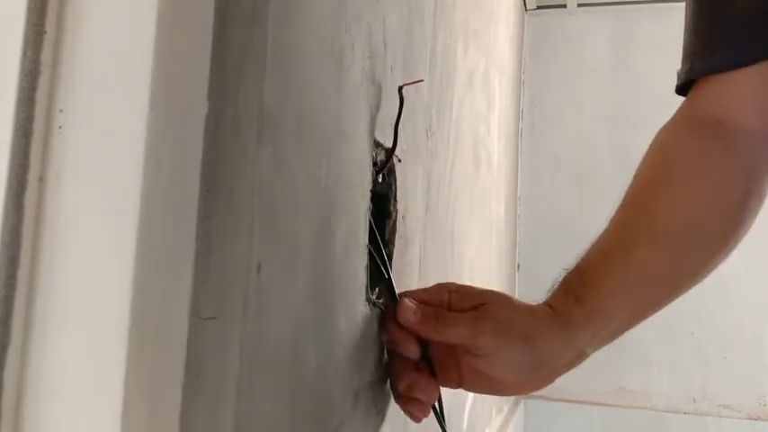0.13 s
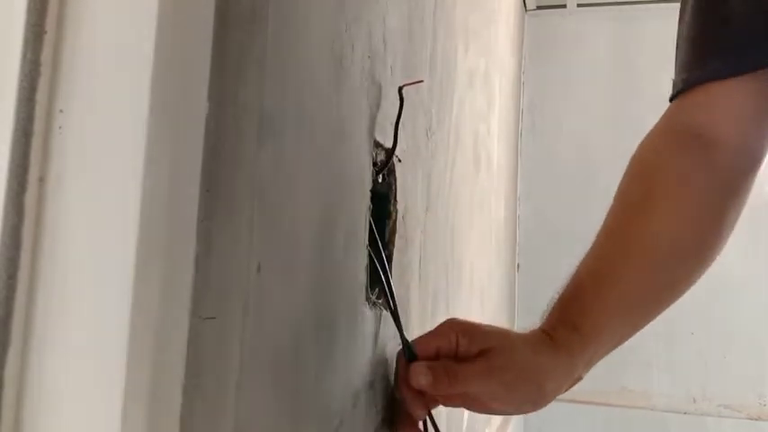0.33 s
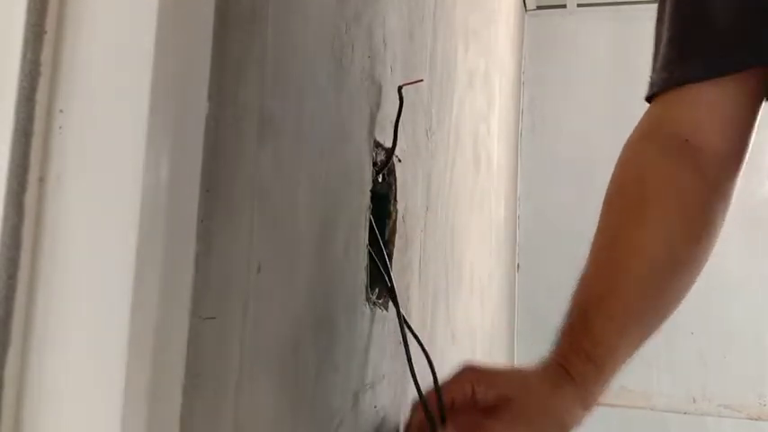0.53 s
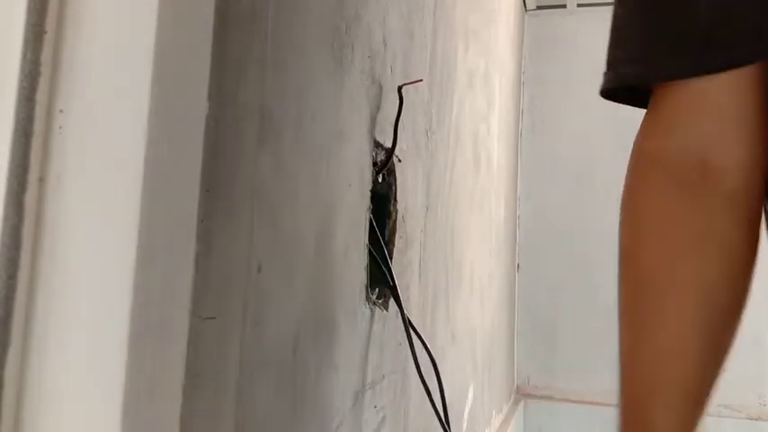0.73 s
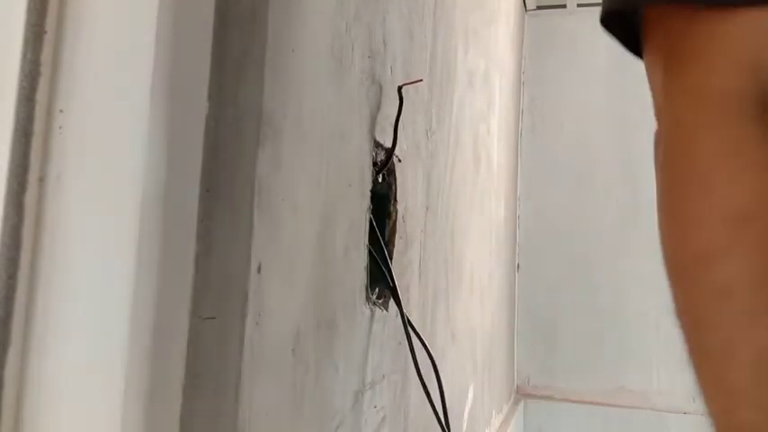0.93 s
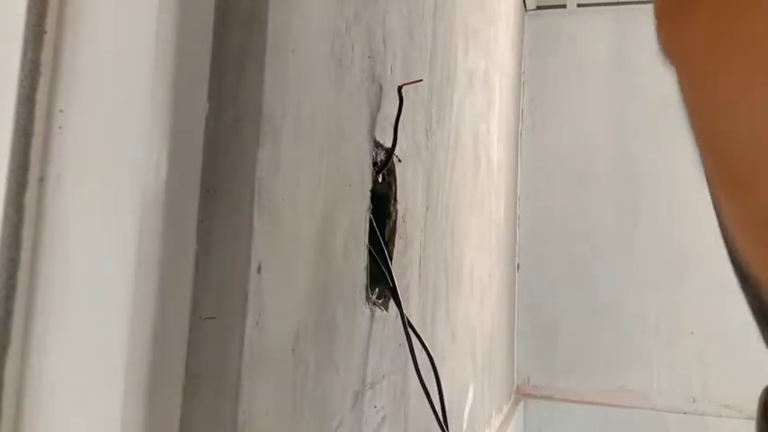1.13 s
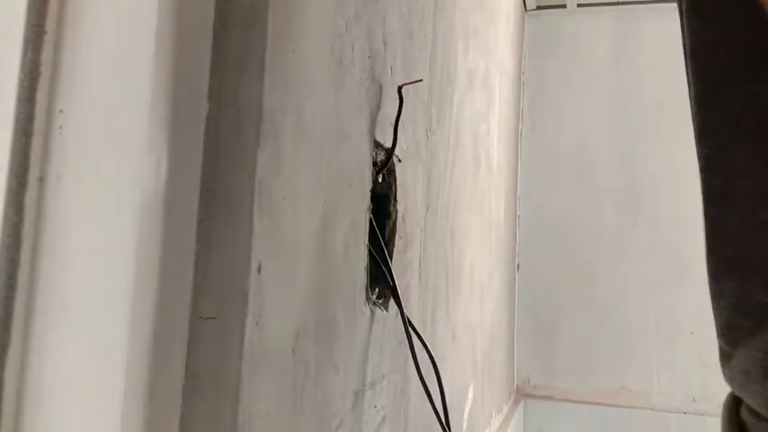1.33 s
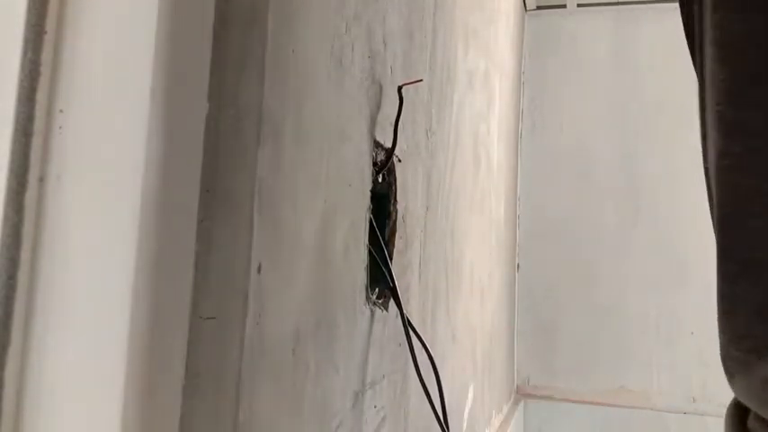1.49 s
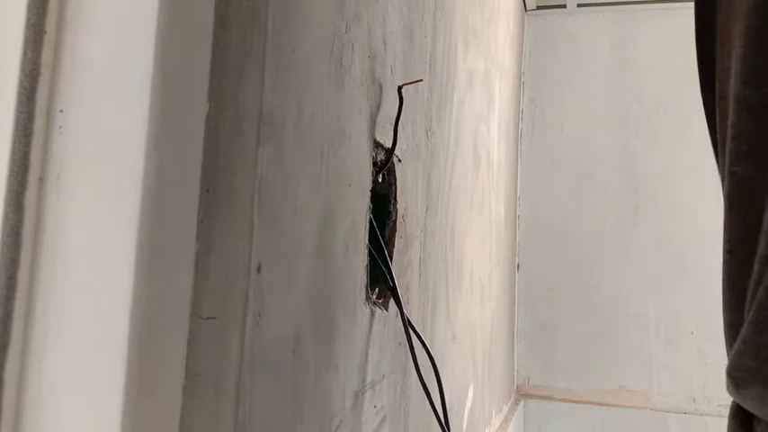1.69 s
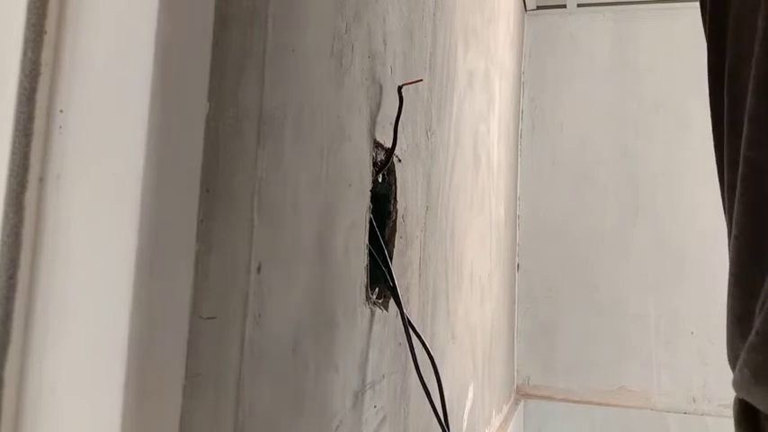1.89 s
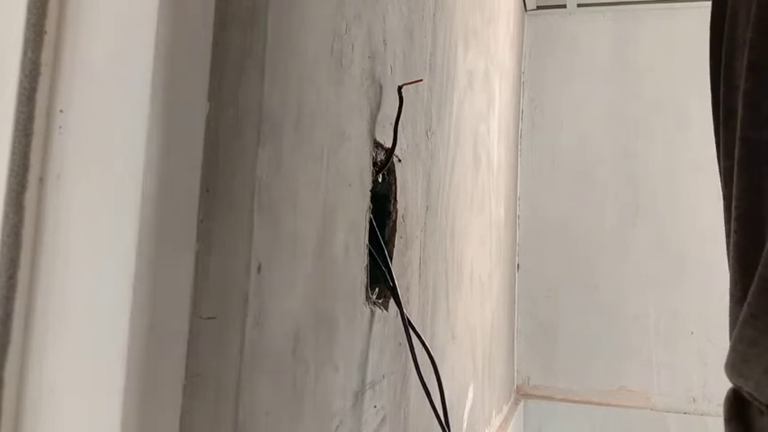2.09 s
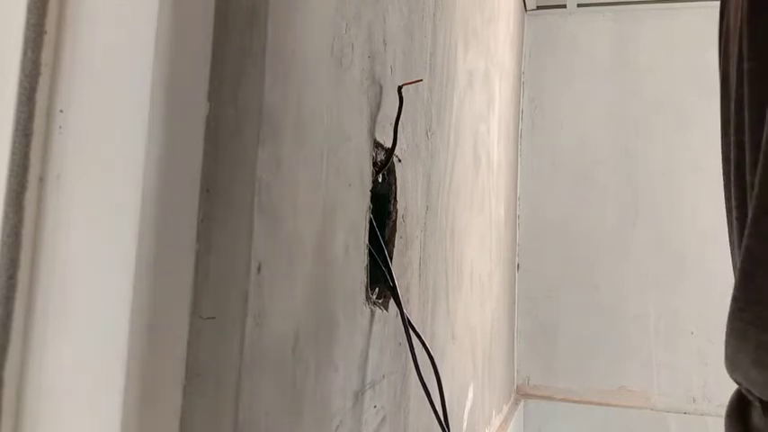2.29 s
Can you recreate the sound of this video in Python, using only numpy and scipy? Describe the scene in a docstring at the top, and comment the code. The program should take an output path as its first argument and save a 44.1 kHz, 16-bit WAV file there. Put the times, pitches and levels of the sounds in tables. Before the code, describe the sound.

Electrical wire pulled through conduit into a wall box: short scrape, sharp snaps, light ticks, a quick clatter on the wall, then a squealing juddering pull ending in a snap; close microphone, bare echoing room.

```python
"""A bare plastered room, close to a wall switch box: electrical wire is tugged through a conduit into it.
Grains and hiss make the insulation's scrape; clicks with a gritty slip make its snaps, through pipe resonances.
Stiff wires tick on the box rim, with pings, and clatter on the wall; the room answers contacts and scraping.
Narrow bands of noise make the hollow squeak and gliding squeals, random slips the judder of the slow pull.
Behind them lie low rumble, a person's dull shuffle and faint steady air."""
import sys
import numpy as np
from scipy import signal
from scipy.fft import rfft, irfft, next_fast_len
from scipy.io import wavfile
from scipy.ndimage import uniform_filter1d, map_coordinates

SR = 44100
rng = np.random.default_rng(int(sys.argv[2]) if len(sys.argv) > 2 else 0)


def materialize(psi):
    """Save the field psi as 16-bit PCM at rate SR to the path in sys.argv[1].

    A 1-D psi becomes a single channel; in a 2-D psi each row is a channel.
    """
    bounded = np.clip(np.atleast_2d(psi).T, -1, 1)
    quanta = np.round(bounded * 32767).astype(np.int16)
    wavfile.write(sys.argv[1], SR, quanta)


N = 105840  # samples, 2.4 s


def amp(db):
    """Decibels to gain."""
    return 10 ** (np.asarray(db) / 20)


def unit(x):
    """Scaled to rms 1."""
    return x / np.sqrt(np.mean(x ** 2) + 1e-20)


def along(points, hz):
    """Values at hz, interpolated between (Hz, value) points on a log axis."""
    f, v = np.transpose(points)
    return np.interp(np.log(hz + 1), np.log(f + 1), v)


def level(rows):
    """Gain per sample from (s, dB) rows."""
    return amp(np.interp(np.arange(N) / SR, *np.transpose(rows)))


def lifts(modes, hz):
    """Resonance peaks in dB; the width is where the lift has halved."""
    return sum(db / (1 + (2 * (hz - f) / width) ** 2) for f, width, db in modes)


def coloured(x, curve):
    """x through a causal minimum-phase filter whose gain in dB is curve(Hz)."""
    half = next_fast_len(len(x) // 2 + SR // 10)
    gain = amp(curve(np.fft.rfftfreq(2 * half, 1 / SR)))
    cepstrum = irfft(np.log(gain + 1e-7))
    # folding the cepstrum forward in time makes the filter causal
    cepstrum[1:half] *= 2
    cepstrum[half + 1:] = 0
    response = np.exp(rfft(cepstrum))
    return irfft(rfft(x, 2 * half) * response)[:len(x)]


def evened(x, size=45):
    """Levels the broad chance peaks of a one-second response, keeping its fine ripple."""
    power = np.abs(uniform_filter1d(np.abs(rfft(x)) ** 2, size)) + 1e-12
    bins = np.fft.rfftfreq(len(x), 1 / SR)
    return coloured(x, lambda hz: -10 * np.log10(np.interp(hz, bins, power)))


def noise(body):
    """Noise of rms 1 with the given spectrum."""
    return unit(coloured(rng.standard_normal(N), lambda hz: along(body, hz)))


def room():
    """One second of room response: direct sound, near walls and a tail whose treble dies sooner than its bass."""
    # Decay of the plastered room. Each row: frequency in Hz, t60 in s.
    decay = [(200, 1), (900, 0.59), (1600, 0.51), (3200, 0.51), (5500, 0.42), (9000, 0.3), (15000, 0.33)]
    direct_db, early_db = -17.5, -2  # against the tail
    early_t60_s, echoes_per_s = 0.19, 4000

    hz, t, z = signal.stft(rng.standard_normal(SR), SR, nperseg=256)
    fading = z * amp(-60 * t / along(decay, hz)[:, None])
    tail = signal.istft(fading, SR, nperseg=256)[1][:SR]

    echoes = rng.standard_normal(SR) * (rng.random(SR) < echoes_per_s / SR)
    walls = echoes * amp(-60 * np.arange(SR) / SR / early_t60_s)
    response = tail / np.linalg.norm(tail) + amp(early_db) * walls / np.linalg.norm(walls)
    response[0] += amp(direct_db)
    return response


def background():
    """Low rumble of the room, dull shuffle of the person moving and faint steady air, all shaped noise."""
    # Strength of the rumble and of the shuffle. Each row: time in s, level in dB.
    rumble_level = [(0, -60.5), (.5, -70.5), (.62, -56), (.76, -52), (.9, -58.5), (1.12, -66.5),
                    (1.3, -50.5), (1.5, -62.5), (1.8, -62), (2.1, -53.5), (2.4, -63)]
    shuffle_level = [(0, -62), (.1, -66), (.2, -62), (.31, -50.5), (.45, -71), (1.1, -67), (1.6, -61.5),
                     (1.9, -63), (2.0, -53), (2.17, -51), (2.3, -60), (2.4, -64)]
    # Spectra of rumble, shuffle and air. Each row: frequency in Hz, relative level in dB.
    rumble_body = [(20, -48), (40, -9), (55, -20), (68, -2), (82, 3.5), (100, -6.5), (135, 5), (165, 0.5),
                   (230, -17.5), (400, -14), (900, -30), (3000, -71)]
    shuffle_body = [(30, -55), (130, -4.5), (220, 3), (400, -1), (650, -2), (1100, -5), (3000, -80)]
    air_body = [(100, -9), (600, 7.5), (1300, 6), (2200, -1.5), (4200, -8), (5400, 7), (6500, -33),
                (15000, -15)]
    air_db = -62.5

    rumble = noise(rumble_body) * level(rumble_level)
    shuffle = noise(shuffle_body) * level(shuffle_level)
    return rumble + shuffle + amp(air_db) * noise(air_body)


def squeak():
    """Friction keeps one narrow resonance of the pipe sounding: a hollow squeak made of narrow noise."""
    # Strength of the squeak. Each row: time in s, level in dB.
    strength = [(0, -53.5), (.1, -54.5), (.18, -59.5), (.45, -58), (.62, -41.5), (.72, -49), (.95, -55.5),
                (1.08, -64), (1.45, -52), (1.8, -55), (1.91, -61), (2.1, -41), (2.28, -50), (2.35, -46.5),
                (2.4, -45.5)]
    centre_hz, half_width_hz = 1243.5, 49  # 6 dB down at the half width

    band = lambda hz: -20 * np.log10(1 + ((hz - centre_hz) / half_width_hz) ** 2)
    return unit(coloured(rng.standard_normal(N), band)) * level(strength)


def hoarse(pitch, half_width_hz):
    """A narrow band of noise of rms 1 around a gliding pitch: two slow noises on a cosine and a sine."""
    phase = 2 * np.pi * np.cumsum(pitch) / SR
    lowpass = lambda hz: -20 * np.log10(1 + (hz / half_width_hz) ** 2)  # 6 dB down at the half width
    waver = lambda: unit(coloured(rng.standard_normal(N), lowpass))
    return waver() * np.cos(phase) + waver() * np.sin(phase)


def glide(rows):
    """Uneven stick and slip around a gliding pitch, silent outside the rows' times."""
    s, pitch, db = np.transpose(rows)
    t = np.arange(N) / SR
    sounding = (t > s[0]) & (t < s[-1])
    return hoarse(np.interp(t, s, pitch), 40) * level(list(zip(s, db))) * sounding  # half width 40 Hz


def whistle():
    """A thin high stick-slip squeak as the wire slackens."""
    # Path of the squeak. Each row: time in s, pitch in Hz, level in dB.
    path = [(1.04, 4990, -88), (1.09, 4850, -64), (1.125, 5050, -81), (1.17, 5050, -90)]
    return glide(path)


def squeal():
    """The slow pull draws a hoarse stick-slip squeal that rises as the wire tightens."""
    # Path of the squeal. Each row: time in s, pitch in Hz, level in dB.
    path = [(1.58, 1600, -72), (1.63, 1666, -55), (1.72, 1690, -52), (1.825, 1718, -50.5), (1.9, 1700, -64)]
    return glide(path)


def drag():
    """The slow pull judders on the pipe wall: irregular slips keep a few narrow resonances ringing."""
    # Strength of the judder. Each row: time in s, level in dB.
    strength = [(1.52, -81), (1.61, -48.5), (1.7, -47.5), (1.77, -52), (1.825, -48), (1.87, -56.5),
                (1.93, -52), (2, -94)]
    # Pipe resonances. Each row: frequency in Hz, half width in Hz (6 dB down), relative level in dB.
    modes = [(1068, 22, -2.5), (1308, 21, -0.5), (1558, 32, 0)]
    slips_per_s = 180  # on average

    slips = (rng.random(N) < slips_per_s / SR) * rng.standard_normal(N)
    peaks = lambda hz: sum(amp(db) / (1 + ((hz - f) / width) ** 2) for f, width, db in modes)
    return unit(coloured(slips, lambda hz: 20 * np.log10(peaks(hz)))) * level(strength)


def scrape(body, strokes):
    """Tiny slips of the insulation over a soft hiss, in uneven spurts, heard through the room."""
    grains_per_s, grain_spread_db = 700, 3
    hiss_db = -3  # against the grains
    uneven_db, uneven_per_s = 1.5, 70  # the grip comes and goes

    hits = (rng.random(N) < grains_per_s / SR) * rng.standard_normal(N)
    grains = hits * amp(grain_spread_db * rng.standard_normal(N))
    rough = unit(grains) + amp(hiss_db) * rng.standard_normal(N)
    friction = coloured(rough, lambda hz: along(body, hz))

    knots = rng.standard_normal(size=512)
    grip = amp(uneven_db * map_coordinates(knots, [np.arange(N) * uneven_per_s / SR]))
    return signal.fftconvolve(unit(friction * grip) * level(strokes), evened(room()))[:N]


def brushing():
    """Brighter brushing of the wire over the box rim, grains of friction with more treble."""
    # Strokes over the rim. Each row: time in s, level in dB.
    strokes = [(0, -46.5), (0.081, -57), (.17, -65), (.48, -59), (.55, -49.5), (.63, -61), (.75, -70),
               (.79, -59), (.92, -76), (.98, -55.5), (1.04, -93), (1.56, -72), (1.65, -61), (1.8, -85),
               (1.87, -67), (2.1, -58.5), (2.2, -50), (2.31, -52), (2.4, -61)]
    # Spectrum of the brushing. Each row: frequency in Hz, relative level in dB.
    body = [(30, -57), (200, -30), (600, 6.5), (1500, 2), (2700, 0.5), (4000, -4), (5600, -11),
            (6800, -15.5), (10000, -14.5), (15000, -15)]
    return scrape(body, strokes)


def rubbing():
    """Insulation rubs along the pipe in pulls, grains of friction in a hollow spectrum."""
    # Strokes in the pipe. Each row: time in s, level in dB.
    strokes = [(0, -31.5), (0.069, -85), (.15, -79), (.46, -49.5), (.55, -43.5), (.63, -48), (.78, -68),
               (.96, -52), (1.03, -68.5), (1.42, -54), (1.57, -54), (1.62, -45.5), (1.81, -44.5),
               (1.86, -54), (1.928, -42.5), (2.149, -41), (2.3, -63.5), (2.4, -62)]
    # Spectrum of the rubbing. Each row: frequency in Hz, relative level in dB.
    body = [(30, -54), (150, -33.5), (500, -6.5), (900, -4), (1100, 1.5), (1400, 1), (1650, 1.5),
            (2050, -1.5), (3400, 0.5), (4300, -7.5), (5500, -6), (6500, -23.5), (10000, -25.5),
            (15000, -33)]
    return scrape(body, strokes)


def contact(s, db, curve):
    """A click and a short gritty slip, ringing in a body and in the room; db is the rms of its first 50 ms."""
    slip_decay_s, slip_db = 0.0014, 0.5  # slip energy against the click
    ripple_db, ripple_spacing_hz = 2.31, 70.7  # dense chance resonances, full strength above 4500 Hz

    t = np.arange(SR // 20) / SR
    slip = rng.standard_normal(len(t)) * np.exp(-t / slip_decay_s)
    slip *= amp(slip_db) / np.linalg.norm(slip)
    slip[0] += 1  # the click

    knots = rng.standard_normal(size=1024)
    chance = lambda hz: map_coordinates(knots, [hz / ripple_spacing_hz])
    ripple = lambda hz: ripple_db * along([(2000, 0), (4500, 1)], hz) * chance(hz)
    in_room = evened(signal.fftconvolve(slip, room())[:SR])
    ring = coloured(in_room, lambda hz: curve(hz) + ripple(hz))
    return np.pad(amp(db) * ring / ring[:len(t)].std(), (round(s * SR), N))[:N]


def clatter():
    """The slack wire clatters on the wall: a quick run of duller knocks."""
    # Knocks. Each row: start in s, level in dB.
    knocks = [(1.1745, -32), (1.179, -29.5), (1.190, -31), (1.1965, -30.5), (1.222, -34.5), (1.229, -35.5),
              (1.250, -41)]
    # Spectrum of a knock. Each row: frequency in Hz, relative level in dB.
    body = [(30, -55), (120, -36), (330, -20), (550, -4), (800, -9.5), (1350, -0.5), (2000, -5), (3200, 0),
            (5000, -8), (7000, -21), (10000, -24.5), (15000, -40)]
    # Resonances of a knock. Each row: frequency in Hz, width in Hz, lift in dB.
    modes = [(625, 62, 13.5), (756, 56, 14.5), (812, 46, 13.5), (926, 102, 18), (1065, 25, 14.5),
             (1183, 45, 6.5), (1250, 155, 7.5), (1369.5, 36, 13.5), (1750, 90, 11.5), (2280, 70, 5.5),
             (2906, 21, 10), (5860, 43, 8.5)]

    colour = lambda hz: along(body, hz) + lifts(modes, hz)
    return sum(contact(s, db, colour) for s, db in knocks)


def ping(s, pitch, db):
    """One short, slightly unsteady ring of the box rim: a decaying sine whose phase wanders."""
    t60_s, line_width_hz = 0.17, 41  # the wander alone spreads the tone this wide

    t = np.arange(SR // 4) / SR
    drift = np.cumsum(rng.standard_normal(len(t))) * np.sqrt(2 * np.pi * line_width_hz / SR)
    ring = amp(db - 60 * t / t60_s) * np.sin(2 * np.pi * pitch * t + drift)
    return np.pad(ring, (round(s * SR), N))[:N]


def ticks():
    """Light touches of the wire on the box rim: small bright double contacts, each with its ping."""
    # Touches. Each row: start in s, level in dB, ping pitch in Hz, ping starting amplitude in dB.
    touches = [(0.6515, -36, 1960, -50), (0.6537, -34, 3400, -31), (0.8383, -51, 3300, -58),
               (.843, -37, 1904, -35)]
    # Spectrum of a touch. Each row: frequency in Hz, relative level in dB.
    body = [(30, -54), (200, -30), (700, -16.5), (1100, -5.5), (1400, -11), (1850, -4), (2450, -8),
            (3400, -1), (4700, -5), (5300, -3), (6500, -17), (9500, -20.5), (13000, -31), (15000, -37)]
    # Resonances of a touch. Each row: frequency in Hz, width in Hz, lift in dB.
    modes = [(1510, 56, 8), (1785, 107, 8), (2010, 230, 5), (2947, 59, 10.5), (3270, 23, 8.5),
             (3580, 150, 3.5), (4100, 200, 5.5), (5180, 45, 7.5)]

    colour = lambda hz: along(body, hz) + lifts(modes, hz)
    return sum(contact(s, db, colour) + ping(s, pitch, ping_db) for s, db, pitch, ping_db in touches)


def snaps():
    """The caught wire jumps free and rings the conduit, coloured by where it caught."""
    # Releases. Each row: start in s, level in dB, place from 0 deep in the pipe to 1 at its mouth,
    # tilt in dB per octave.
    releases = [(0.2424, -22, 0.17, -2), (0.2507, -16.5, 0.043, -0.13), (.273, -26.5, 0.15, -3),
                (1.9403, -23.5, 0.86, 0.5), (1.9446, -17.5, 0.86, 0.46)]
    # Spectrum of a snap. Each row: frequency in Hz, relative level in dB deep in the pipe, and at its mouth.
    deep_and_mouth = [(30.2, -88, -49), (124, -34, -18), (337, -34, -17), (657, -21.5, -10),
                      (885, -13.5, -3.5), (1380, -5, -8), (2190, -1.5, 1), (2800, 1, 2), (3210, -1, -1.5),
                      (3950, -4.5, 0), (5550, -8.5, -1), (7320, -21.5, -12.5), (10200, -19.5, -12),
                      (15100, -28.5, -22.5)]
    # Resonances of conduit and box. Each row: frequency in Hz, width in Hz, lift in dB deep in the pipe,
    # lift in dB at its mouth.
    conduit = [(210, 50, 14.5, 1), (541, 62, 13, 0), (769, 43, 18, -1), (947.7, 96, 21, 25.5),
               (1139, 11, 8, 17), (1263.5, 95, 11.5, 22.5), (1466, 65, 8.5, 6.5), (1558, 113, 6.5, 23),
               (1650, 74, 2, 6.5), (1870, 150, 2, 14.5), (2709, 29, 11.5, -23), (3075, 107, 11, 4),
               (3172, 96, -1, 23), (3423, 173, -1.5, 21), (3635, 136, 3.5, 13.5)]

    def colour(hz, place, tilt):
        """Spectrum in dB between the deep and the mouth colour."""
        mix = [1 - place, place]
        body = [(f, np.dot(db, mix)) for f, *db in deep_and_mouth]
        modes = [(f, width, np.dot(db, mix)) for f, width, *db in conduit]
        octaves = np.log2(np.maximum(hz / 2000, .25))  # from 2000 Hz, flat below 500 Hz
        return along(body, hz) + lifts(modes, hz) + tilt * octaves

    return sum(contact(s, db, lambda hz: colour(hz, place, tilt)) for s, db, place, tilt in releases)


def scene():
    """All sources at one microphone."""
    friction = squeak() + whistle() + squeal() + drag() + brushing() + rubbing()
    contacts = clatter() + ticks() + snaps()
    return (background() + friction + contacts)[None]


def record(dry):
    """The microphone's uneven treble, then its band limit."""
    # Treble of the microphone. Each row: frequency in Hz, gain in dB.
    treble = [(6500, -1.5), (7300, -3), (8000, -17), (8900, -7.5), (12000, -6), (13600, -7.5), (14800, 4.5),
              (15500, 3)]
    top_hz = 15550

    x = coloured(dry[0], lambda hz: along(treble, hz))
    passed = np.fft.rfftfreq(2 * N, 1 / SR) < top_hz
    return irfft(rfft(x, 2 * N) * passed)[None, :N]


dry = scene()
out = record(dry)
materialize(out)
```